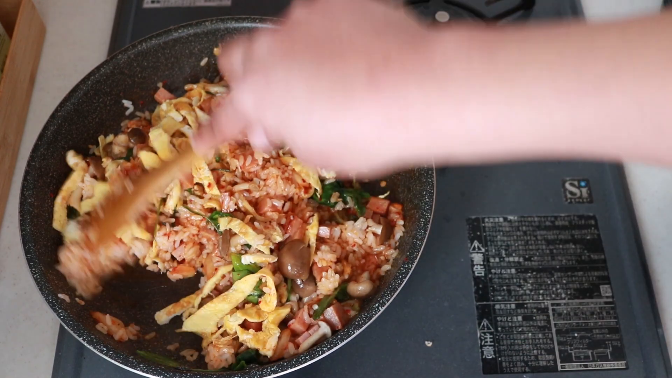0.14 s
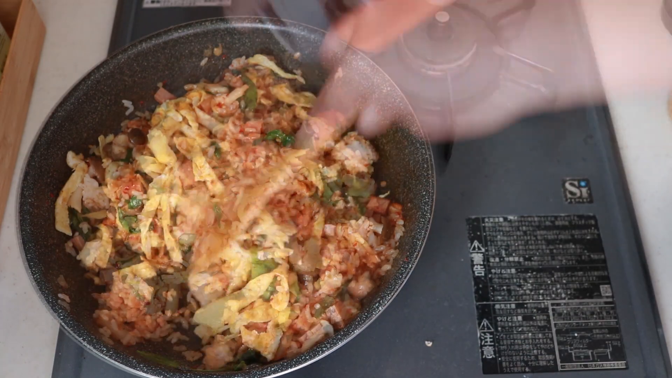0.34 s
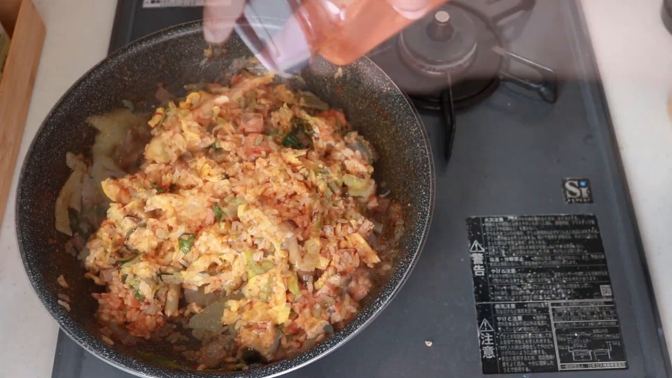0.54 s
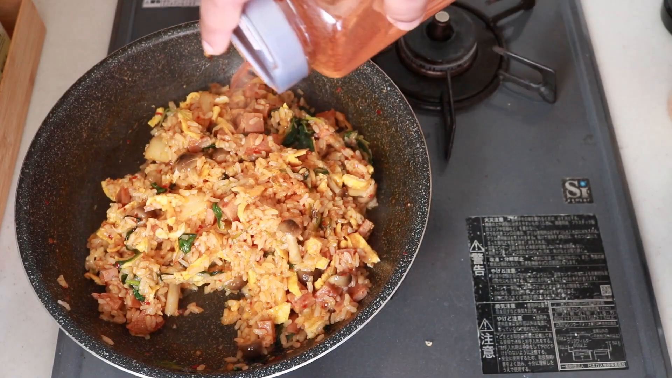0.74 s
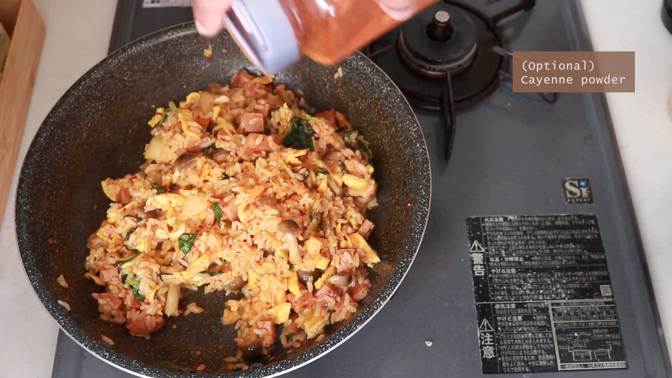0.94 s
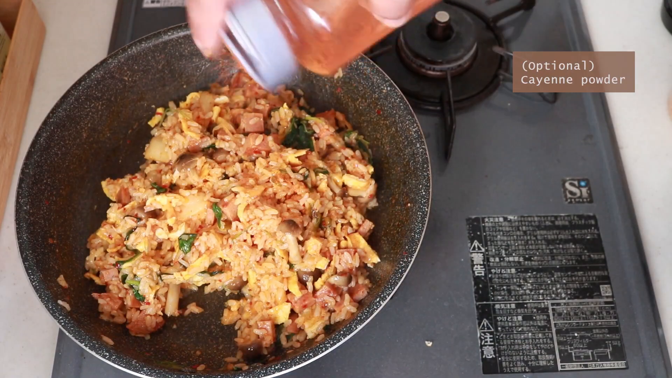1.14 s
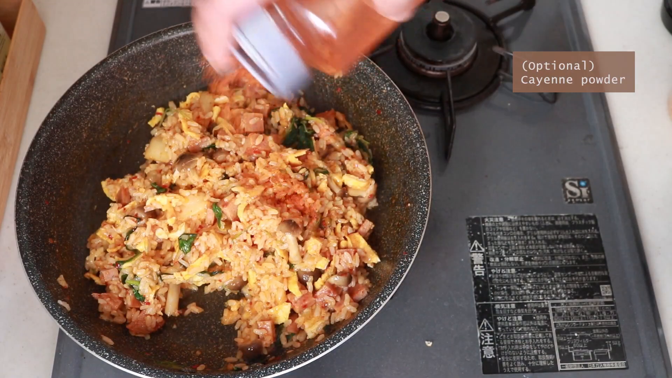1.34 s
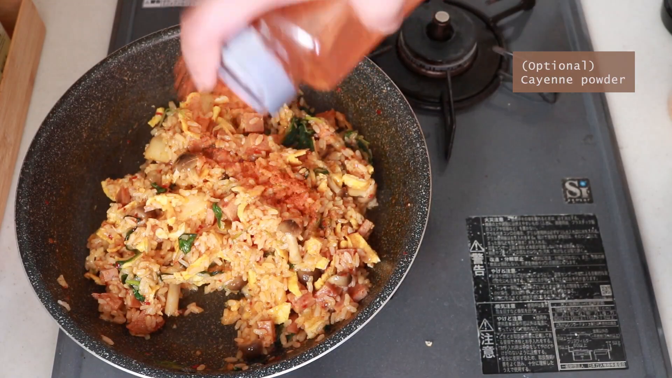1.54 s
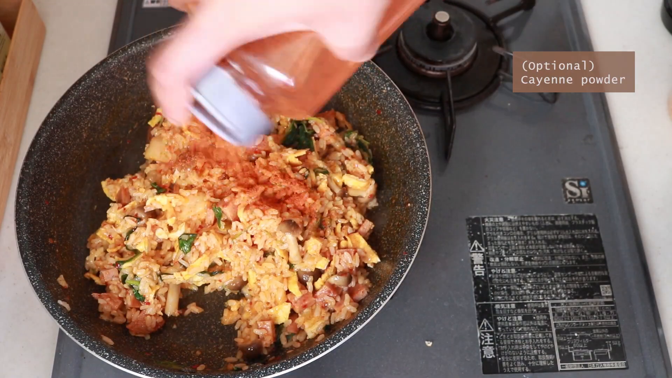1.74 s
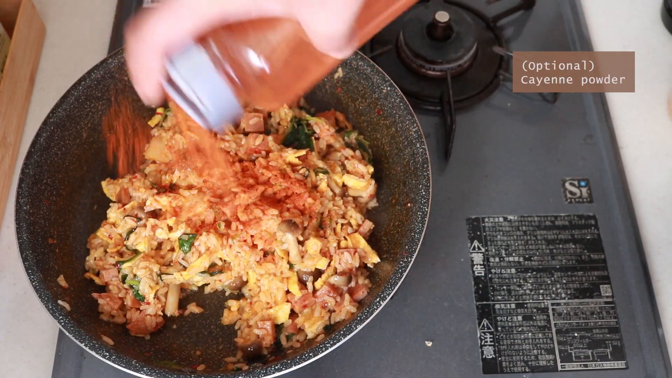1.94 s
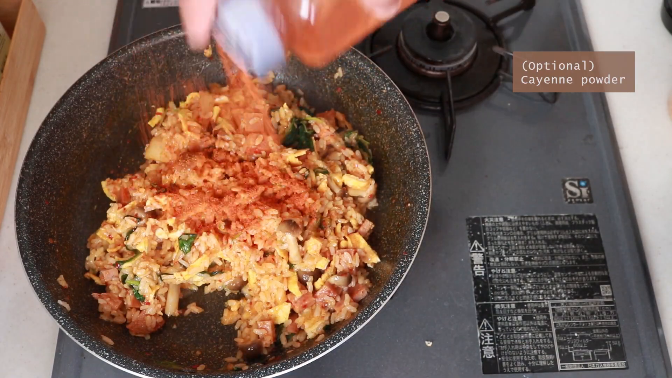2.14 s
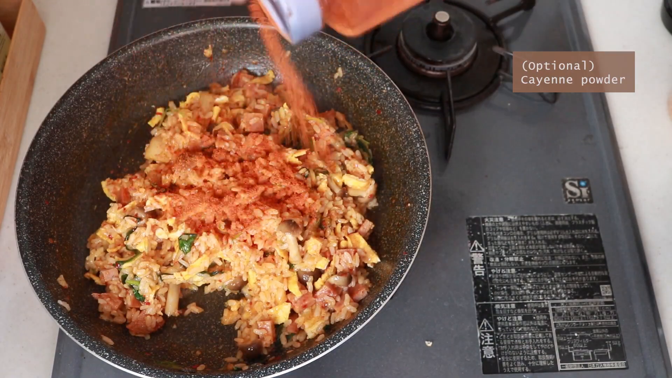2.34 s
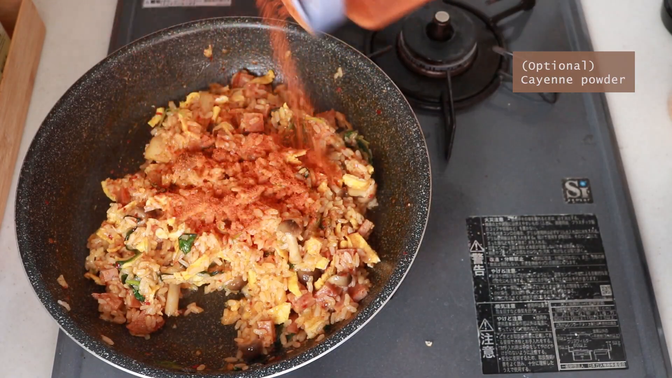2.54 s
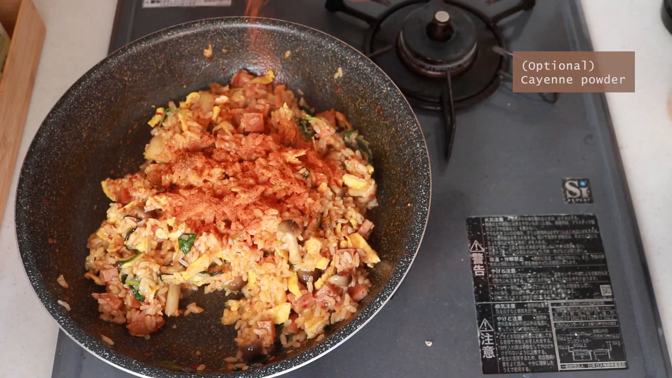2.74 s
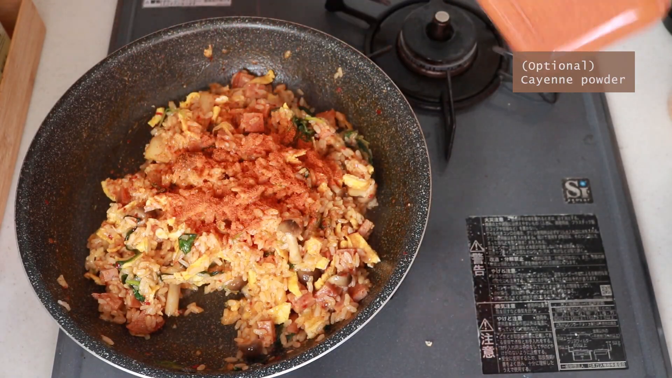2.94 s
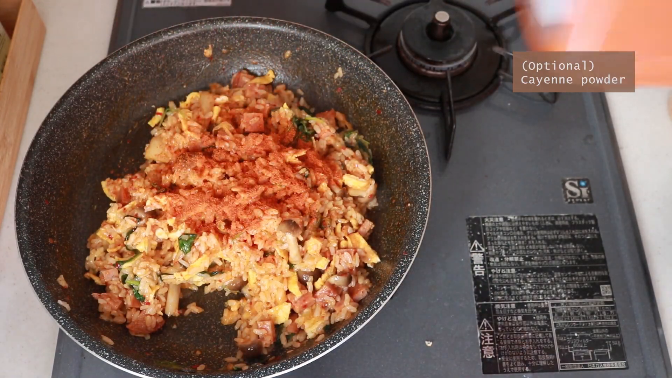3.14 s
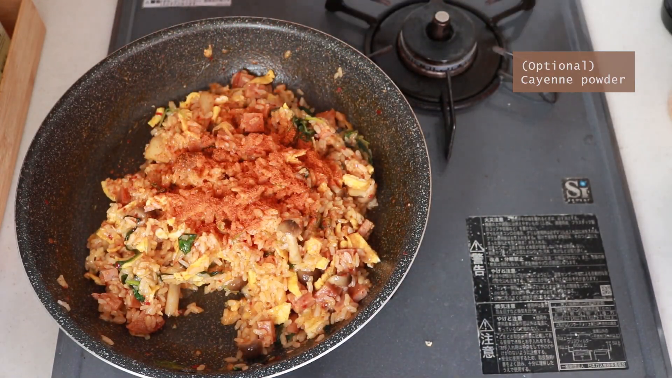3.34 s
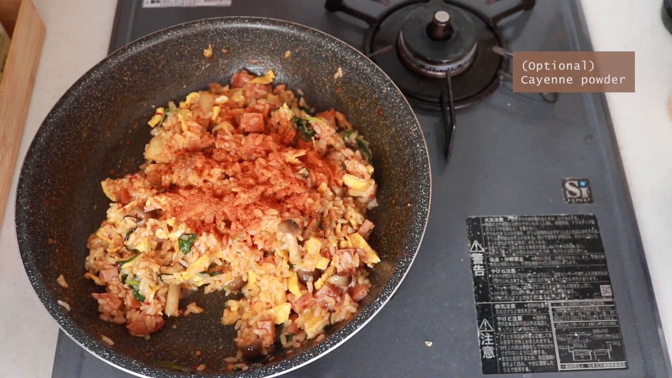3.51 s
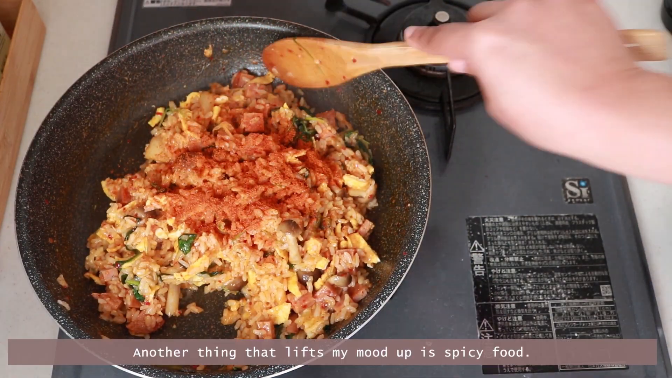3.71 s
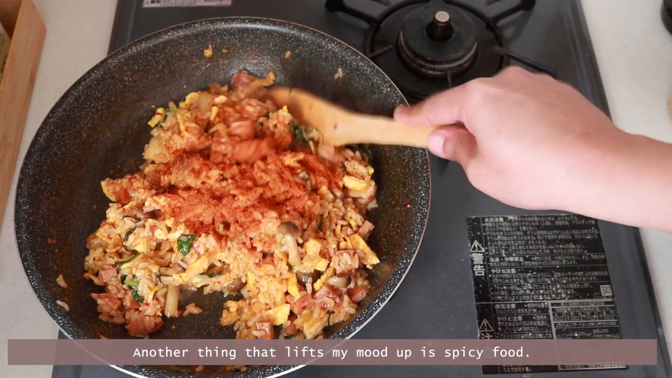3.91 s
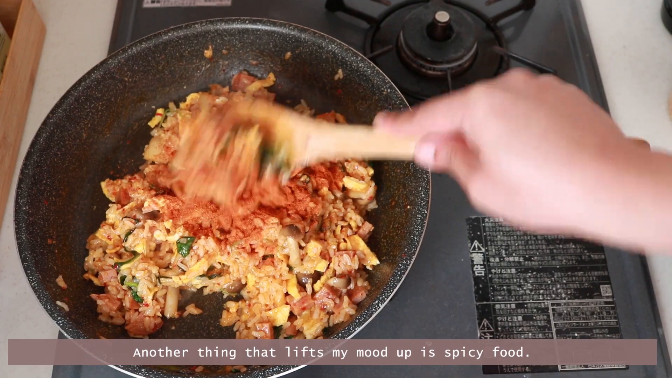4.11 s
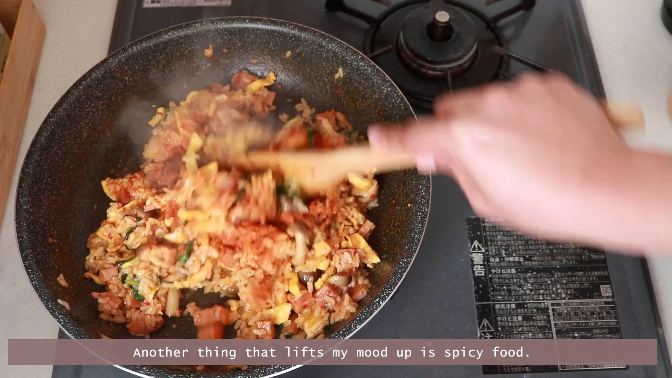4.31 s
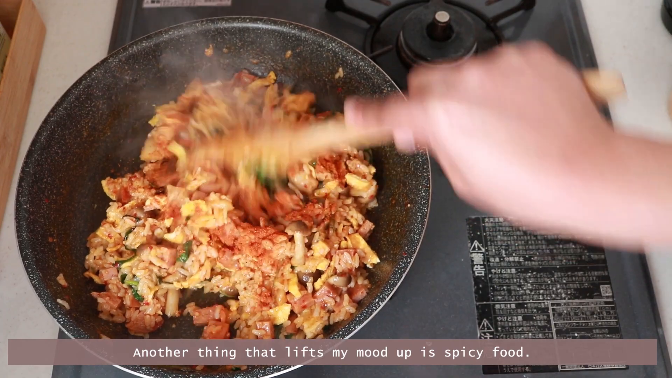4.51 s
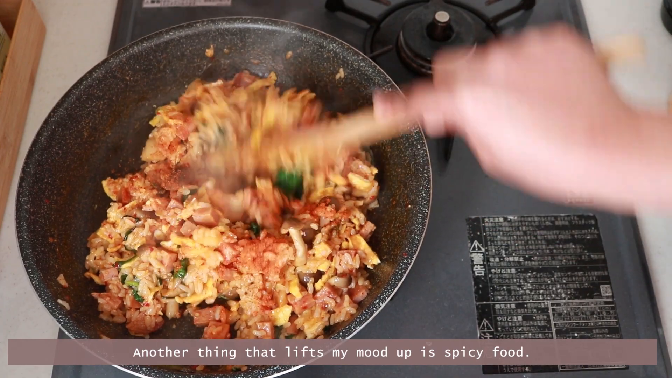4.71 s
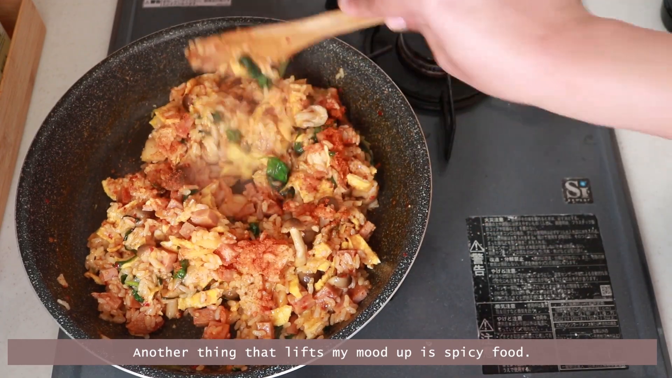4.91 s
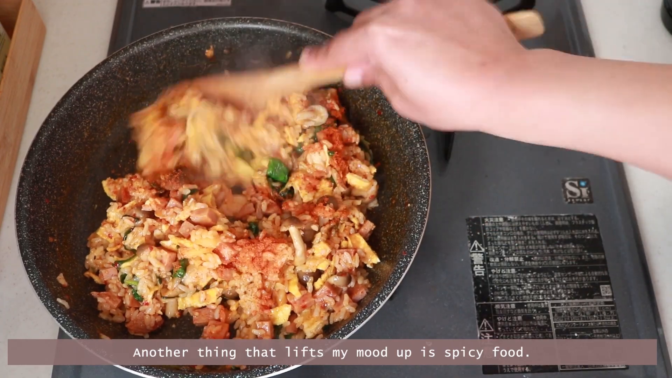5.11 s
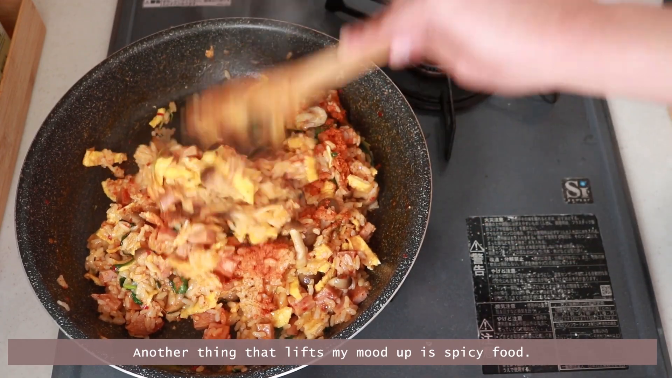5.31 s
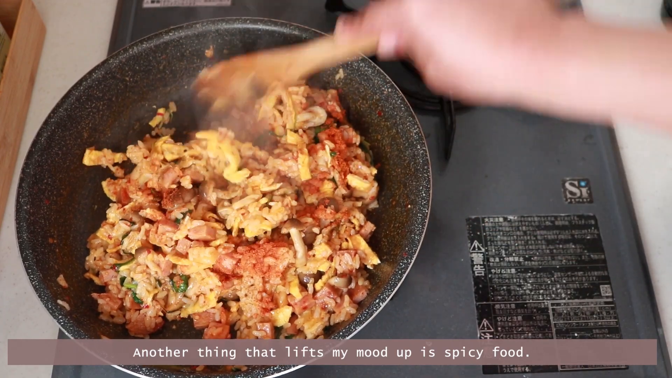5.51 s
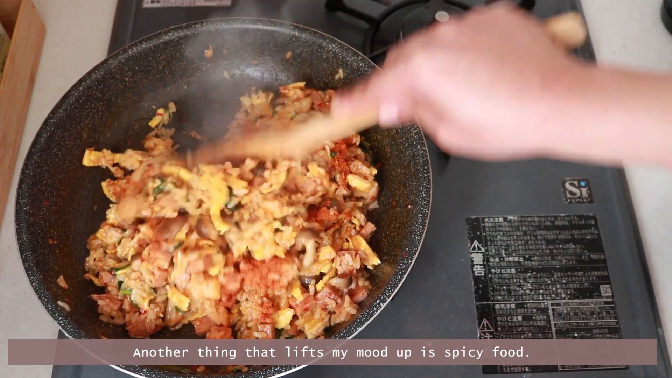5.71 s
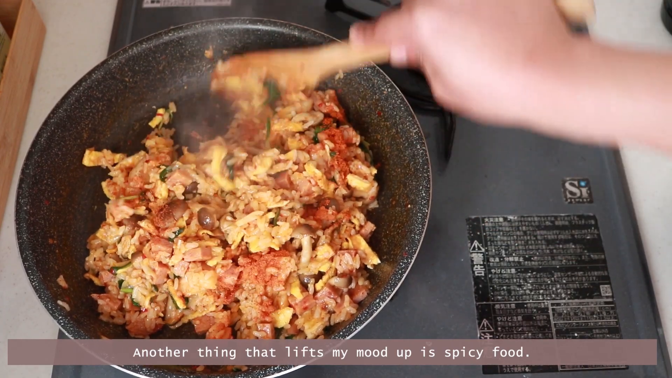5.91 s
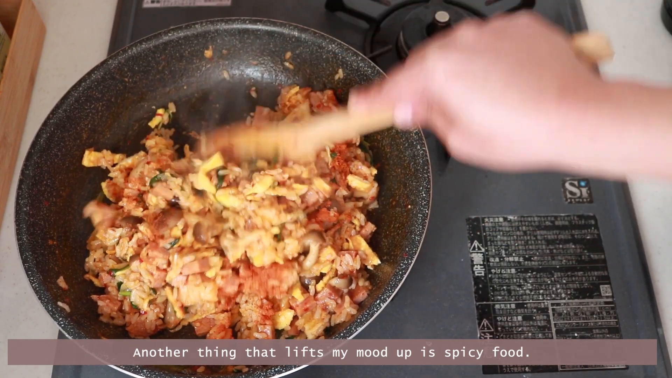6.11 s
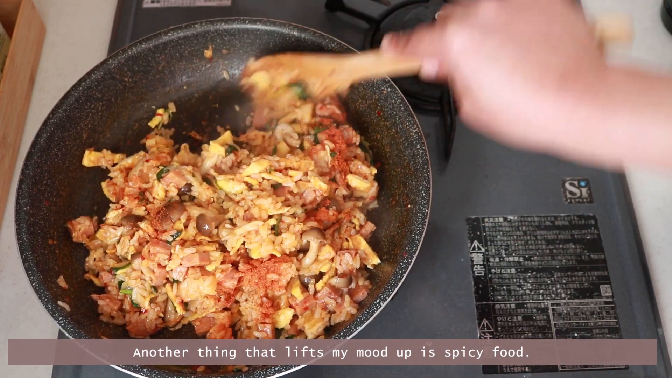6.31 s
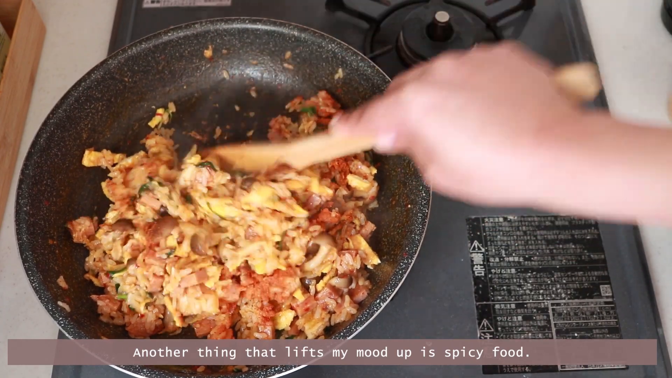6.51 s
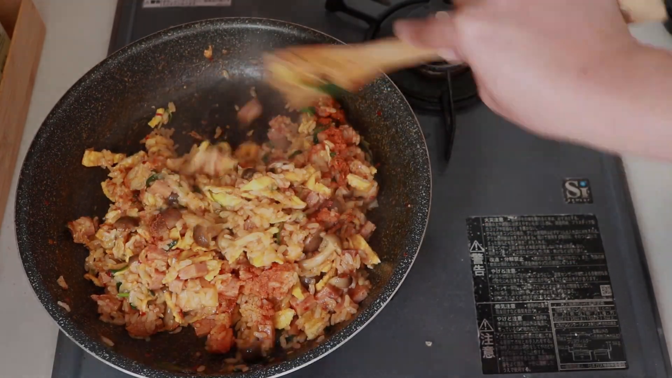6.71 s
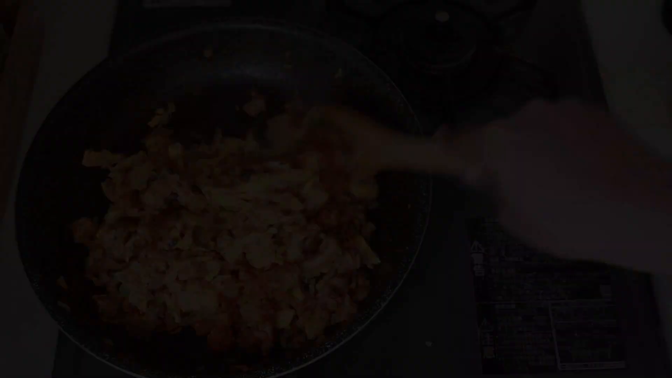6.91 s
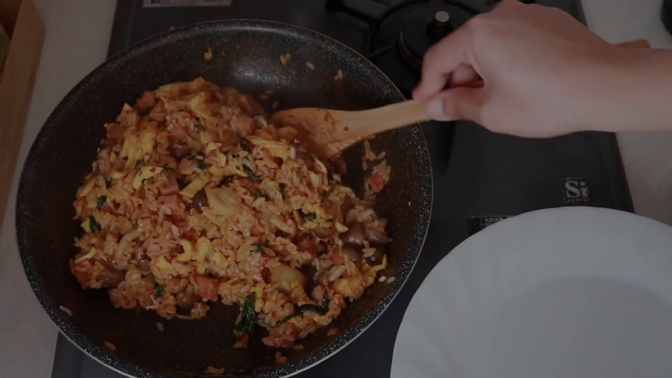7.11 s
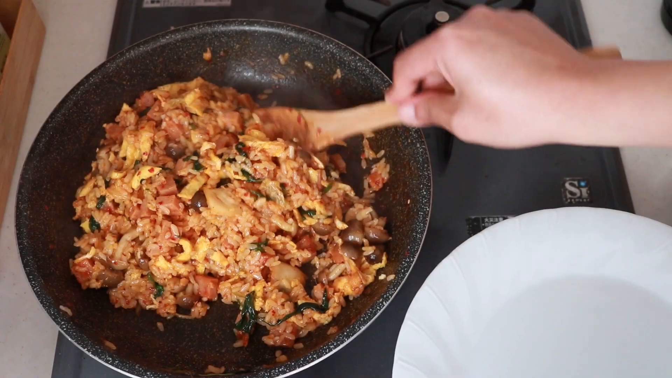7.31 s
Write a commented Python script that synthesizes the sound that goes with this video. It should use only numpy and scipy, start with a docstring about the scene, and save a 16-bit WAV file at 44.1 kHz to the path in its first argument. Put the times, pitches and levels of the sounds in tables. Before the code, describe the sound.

Rice sizzles and spits in a frying pan, then a wooden spatula knocks, scrapes and turns it with moist rustles in a small kitchen.

```python
"""Small kitchen: fried rice sizzles in a pan on a gas hob (bursting bubbles, hiss, fine spray), oil drops spit.
A wooden spoon is put down with a clack and a skid (ringing modes); shaker, spoon and pan bump dully.
Then the spoon knocks on the pan (struck modes), turns the moist rice (squelching grains)
and scrapes along the pan (slip clicks through resonances), over a low rumble and a faint hum."""
import sys
import numpy as np
from scipy import signal
from scipy.fft import rfft, irfft
from scipy.io import wavfile

SR = 44100
rng = np.random.default_rng(int(sys.argv[2]) if len(sys.argv) > 2 else 0)


def wrap_up_sound(samples):
    """Save the sound to the file named by the first command line argument, as 16-bit audio."""
    columns = np.atleast_2d(samples).T
    # keep every value between -1 and 1, then stretch to whole-number steps
    tamed = np.clip(columns, -1, 1)
    steps = np.round(tamed * 32767).astype(np.int16)
    wavfile.write(sys.argv[1], SR, steps)


N = 324132
TIME = np.arange(N) / SR
CUTOFF_HZ = 16100

# Liveliness of the frying. Each row: time in seconds, hiss level in dB before the layer gains.
FRYING_LEVEL = [(0.0, -58), (1.14, -53), (3.21, -50.5), (3.6, -52), (4.34, -49), (4.52, -50.5), (4.81, -47),
                (5.16, -50.5), (5.36, -51), (6.92, -50.5), (7.1, -57), (7.35, -60)]
# Turns of the wet rice. Each row: peak time, rise and fall in seconds, squelch level in dB before the layer gain.
RICE_TURNS = [(3.9, 0.026, 0.12, -46.5), (4.44, 0.093, 0.043, -45), (5.26, 0.14, 0.038, -43.5),
              (5.677, 0.097, 0.02, -41.5), (6.08, 0.1, 0.046, -49.5), (6.455, 0.1, 0.054, -43),
              (6.94, 0.053, 0.11, -46.5)]
# Spoon put down. One row: start in seconds, clack level in dB before the layer gain.
SPOON_CLACK = (0.2941, 0)
# Width of diffuse sound. Each row: frequency in Hz, side-signal gain in dB.
SIDE_WIDTH = [(100, -12.5), (300, -8), (700, -10), (1500, -2.5), (3000, -1.5), (8000, 1.5), (16000, -1)]


def from_db(db):
    """Amplitude ratio of a level in dB."""
    return 10 ** (np.asarray(db) / 20)


def rms_one(x):
    """Scale to an rms of 1."""
    return x / np.sqrt(np.mean(x ** 2) + 1e-20)


def at_hz(points, hz):
    """Interpolate rows of (Hz, value) over log frequency."""
    points = np.array(points)
    return np.interp(np.log(hz), np.log(points[:, 0]), points[:, 1])


def level(rows):
    """Gain over time from rows of (s, dB)."""
    return from_db(np.interp(TIME, *np.transpose(rows)))


def add(out, start_s, sound):
    """Mix a sound in at a start time."""
    i = int(np.clip(round(start_s * SR), 0, N - 1))
    out[..., i:i + sound.shape[-1]] += sound[..., :N - i]


def cut(x, hz, kind, order=2):
    """Butterworth low- or high-pass."""
    sos = signal.butter(order, min(hz, SR / 2 - 1000), kind, fs=SR, output="sos")
    return signal.sosfilt(sos, x)


def drift(rate_hz):
    """Slow random curve of rms 1: noise at SR / 40 through two equal one-pole low-passes."""
    step = 40
    r = np.exp(-2 * np.pi * rate_hz * step / SR)
    noise = rng.standard_normal(N // step + 2002)
    slow = signal.lfilter([1], [1, -2 * r, r * r], noise)[2000:]   # settled part
    return np.interp(np.arange(N) / step, np.arange(len(slow)), rms_one(slow))


def colour(x, spectrum, size=4096):
    """Causal minimum-phase filter, by folded cepstrum, that follows rows of (Hz, dB)."""
    gain_db = at_hz(spectrum, np.fft.rfftfreq(size, 1 / SR) + 1)
    cepstrum = irfft(np.log(from_db(gain_db)))
    cepstrum[1:size // 2] *= 2
    cepstrum[size // 2 + 1:] = 0
    response = irfft(np.exp(rfft(cepstrum)))
    y = signal.oaconvolve(np.atleast_2d(x), response[None], axes=1)
    return y[:, :x.shape[-1]].reshape(x.shape)


def diffuse(size):
    """Stereo noise from all around: alike in the bass, unrelated in the treble."""
    mid, side = rng.standard_normal((2, size))
    side = colour(side, SIDE_WIDTH)
    return np.array([mid + side, mid - side])


def ring(force, modes):
    """Parallel modes (Hz, dB, t60 s); at 0 dB a unit click gives a ring of unit energy."""
    out = 0
    for hz, db, t60_s in modes:
        r = np.exp(-np.log(1000) / (t60_s * SR))
        w = 2 * np.pi * min(hz, SR / 2 - 1000) / SR
        gain = from_db(db) * np.sqrt(2 * (1 - r * r))
        numerator, denominator = [gain, -gain * r * np.cos(w)], [1, -2 * r * np.cos(w), r * r]
        out = out + signal.lfilter(numerator, denominator, force + 1e-18)
    return out


def clicks(per_s, spread_db, size=N):
    """Random clicks of either sign, many small and a few large."""
    chance, weight = rng.random((2, size))
    out = np.zeros(size)
    at = np.flatnonzero(chance < per_s / SR)
    signed = 2 * weight[at] - 1
    rarity = np.minimum(-np.log(np.abs(signed) + 1e-9), 4)
    out[at] = np.sign(signed) * from_db(spread_db * rarity)
    return out


def swell(peak_s, rise_s, fall_s):
    """A push that builds up to its peak and lets go."""
    away = np.abs((TIME - peak_s) / np.where(TIME < peak_s, rise_s, fall_s))
    return np.exp(-np.minimum(away, 9) ** 1.4)


def kitchen(x, wet_db, size=16000):
    """Direct sound, quick reflections from hob and tiles, and a diffuse tail with a decay time per band."""
    # Room decay. Each row: frequency in Hz, t60 in seconds.
    decay_times = [(150, 0.5), (500, 0.2565), (2000, 0.18), (8000, 0.08), (16000, 0.21)]
    t, noise, tail = np.arange(size) / SR, diffuse(size), 0
    edges_hz = np.geomspace(80, 14500, 9)
    for low, high in zip(edges_hz, edges_hz[1:]):
        t60_s = at_hz(decay_times, np.sqrt(low * high))
        band = signal.sosfilt(signal.butter(2, [low, high], "band", fs=SR, output="sos"), noise)
        tail = tail + band * np.exp(-np.log(1000) * t / t60_s)
    tail = tail * np.clip(t / 0.0042 - .3, 0, 1)
    tail = tail / np.sqrt(np.sum(tail ** 2) / 2)
    # side reflections reach left and right in opposite phase
    near = rng.standard_normal(size) * np.exp(-t / 0.0028)
    near = colour(near / np.sqrt(np.sum(near ** 2)), SIDE_WIDTH)
    near = cut(near, 450, "high") * [[1], [-1]]
    response = from_db(wet_db) * tail + from_db(-3.0) * near
    return x + signal.oaconvolve(x * np.ones((2, 1)), response, axes=1)[:, :N]


def rumble():
    """Low diffuse noise shaped by a fixed spectrum."""
    # Each row: frequency in Hz, relative density in dB per Hz.
    spectrum = [(20, -13), (40, -15), (58, 2), (80, -7.5), (120, -8.5), (200, -10), (400, -10), (900, -15),
                (3000, -29)]
    return from_db(-68.5) * rms_one(colour(diffuse(N), spectrum))


def hum():
    """Faint steady sine; the level is its rms."""
    return from_db(-77.5) * np.sqrt(2) * np.sin(2 * np.pi * 59.5 * TIME)


def crackle(per_s, spread_db, low_hz, high_hz, cycles, count=13):
    """Tiny bursting bubbles as short rings at a row of pitches, alternating in side; rms 1."""
    out = np.zeros((2, N))
    for k, hz in enumerate(np.geomspace(low_hz, high_hz, count)):
        grains = ring(clicks(per_s / count, spread_db), [(hz, 10 * np.log10(hz), cycles / hz)])
        out += grains * from_db(np.array([[1], [-1]]) * (-1) ** k * 2.2)
    return rms_one(out)


def sizzle():
    """Water boils out of the rice: crackle on a smooth hiss; the spray also swells as moist rice is turned."""
    # Body and spray spectra. Each row: frequency in Hz, relative density in dB per Hz.
    body_spectrum = [(150, -20.5), (400, -4.5), (620, -12), (760, -0.5), (1130, 2), (1900, 1.5),
                     (3000, 1.5), (4400, -1.5), (7000, -8), (10000, -22.5), (16000, -49)]
    spray_spectrum = [(2000, -22.5), (5000, -3.5), (8000, -4), (10000, -8.5), (12000, -13), (14400, -9.5),
                      (16000, -22)]
    body_gain_db, spray_gain_db = -0.5, -2.5
    steam_over_squelch_db, steam_rise_s, steam_fall_s = -20.5, 0.069, 0.71

    bubbles = crackle(1000 * from_db(3 * drift(7.9)), spread_db=7.0, low_hz=770, high_hz=11600, cycles=4.2)
    body = rms_one(kitchen(bubbles, wet_db=-0.5)) + from_db(0.5) * diffuse(N)
    body = rms_one(colour(body, body_spectrum))

    mist = crackle(900 * from_db(2.3 * drift(1.7)), spread_db=5.0, low_hz=5000, high_hz=14500, cycles=3.5)
    spray = rms_one(kitchen(mist, wet_db=-7)) + from_db(-2.0) * diffuse(N)
    spray = rms_one(colour(spray, spray_spectrum))

    frying = level(FRYING_LEVEL)
    steam = sum(from_db(db + steam_over_squelch_db) * swell(peak_s, steam_rise_s, steam_fall_s)
                for peak_s, _, _, db in RICE_TURNS)
    spray = spray * np.hypot(from_db(spray_gain_db) * frying, steam)
    return from_db(body_gain_db) * frying * body + spray * from_db([[.8], [-.8]])


def small_drops(count=300):
    """Random drops, louder in livelier frying, as rows of (s, dB, pitch Hz, left-right dB)."""
    drops_per_s = 16
    over_hiss_db, spread_db = 17, 3
    centre_hz, spread_octaves = 5200, 0.47
    pan_db, pan_spread_db = 1.0, 2.5
    when, chance = rng.random((count, 2)).T
    strength, pitch, side = np.clip(rng.standard_normal((count, 3)), -2, 2).T
    s = when * N / SR
    db = np.interp(s, *np.transpose(FRYING_LEVEL)) + over_hiss_db + spread_db * strength
    hz = centre_hz * 2 ** (spread_octaves * pitch)
    rows = np.column_stack([s, db, hz, pan_db + pan_spread_db * side])
    return rows[chance < drops_per_s * N / SR / count]


def spits(size=400):
    """A drop bursts with a snap of about one cycle; the pan wall throws it back within a few milliseconds."""
    # Loudest snaps: bursting drops, and the shaker's sharp shakes from 2.07 to 2.30 s. Each row: start in
    # seconds, # level in dB, pitch in Hz, left-right balance in dB; level and balance are before the layer
    # gains.
    loud_snaps = [(0.404, -32, 3770, -3), (0.5417, -35.5, 3700, -7), (0.5876, -35.5, 4000, -3),
                  (0.8888, -32, 2980, -3), (1.058, -28, 3370, 0), (1.2945, -25, 3470, -7.5),
                  (1.4648, -28, 3200, 3), (1.538, -27.5, 5550, -2), (1.6163, -28, 8050, -2),
                  (2.0722, -21, 7600, -2), (2.0864, -24.5, 8330, -3), (2.1474, -31.5, 2650, 2.0),
                  (2.173, -27, 2950, -3), (2.2328, -22, 5690, 1.5), (2.2954, -22.5, 8200, 1),
                  (2.592, -29.5, 4020, -1), (2.69, -32, 3030, -4), (2.814, -23.5, 3200, 2),
                  (2.856, -25, 9600, 0), (3.048, -27, 2280, -1.5), (3.101, -34, 3220, -4),
                  (3.3064, -27.5, 6400, -0.5), (3.5109, -29.5, 3360, -5), (3.851, -19.5, 6600, -0.5),
                  (4.0063, -23.5, 2460, 0.0), (4.427, -35, 2330, 1.0), (4.5317, -15.5, 10500, 2.5),
                  (4.58, -29, 4600, 1.0), (4.6308, -25, 3650, -4), (4.874, -28, 3450, 4),
                  (4.9624, -26.5, 2800, 0.0), (5.32, -26.5, 3220, -1), (6.4164, -23.5, 5450, -1),
                  (6.576, -34, 6800, -6)]
    top_over_pitch = 2.66
    out, t = np.zeros((2, N)), np.arange(size) / SR
    # hollow between the grains
    plop = ring(signal.unit_impulse(size), [(1500, -26.5, 0.0013), (3370, -12, 0.0023)])
    for s, db, hz, pan_db in [*loud_snaps, *small_drops()]:
        turns = t * min(hz, CUTOFF_HZ)
        snap = np.cos(2 * np.pi * turns) * np.exp(-turns / 0.52)
        burst = cut(snap + from_db(-14.5) * plop, 800, "high")
        burst = cut(burst, top_over_pitch * hz, "low")
        scatter = rng.standard_normal((2, size)) * np.exp(-t / 0.0036)
        scatter = scatter / np.sqrt(np.sum(scatter ** 2) / 2)
        echoes = signal.fftconvolve(burst[None], scatter, axes=1)[:, :size]
        balance = from_db([[pan_db / 2], [-pan_db / 2]])
        add(out, s, from_db(db) * (burst + from_db(0.5) * echoes) * balance)
    return from_db(4.5) * kitchen(out, wet_db=-5) * from_db([[.5], [-.5]])


def skid_level():
    """The skid sets in with the clack, holds and dies away."""
    start_db, attack_s, hold_s, release_db_per_s = -32.5, 0.0085, 0.061, 520
    t = np.maximum(TIME - SPOON_CLACK[0], 0)
    attack = 1 - np.exp(-t / attack_s)
    return attack * from_db(start_db - release_db_per_s * np.clip(t - hold_s, 0, .5))


def spoon_down():
    """One dry clack, then the spoon skids to rest; wood carries little treble."""
    # Modes of spoon and rest. Each row: frequency in Hz, level in dB, t60 in seconds (as in the skid).
    modes = [(624, -13, 0.037), (815, -12.5, 0.052), (1170, -13.5, 0.012), (1340, -6.5, 0.025),
             (1510, -5, 0.0094), (1660, -12, 0.057), (1820, -10, 0.041), (2200, -18, 0.026),
             (2480, -12, 0.018), (2870, -0.5, 0.016), (3150, -13, 0.028), (3280, -9, 0.046),
             (3270, -0.5, 0.016), (3560, -4.5, 0.012), (5000, -14, 0.0057), (5110, -14, 0.017),
             (5750, -15, 0.0071)]
    start_s, clack_db = SPOON_CLACK
    tap = from_db(clack_db) * signal.unit_impulse(SR // 10)
    clack_modes = [(hz, db, t60_s * 0.76) for hz, db, t60_s in modes]   # the clack rings shorter
    clack = cut(ring(tap, clack_modes), 3570, "low", order=6)
    slips = (clicks(3500, 1.4) * skid_level())[:SR]
    skid = cut(ring(slips, modes[::2]) - ring(slips, modes[1::2]), 11400, "low", order=6)
    spoon = np.zeros(N)
    add(spoon, start_s, from_db(-11) * clack)
    add(spoon, 0, from_db(5.5) * skid)
    return kitchen(cut(spoon, 400, "high"), wet_db=-9)


def bumps():
    """Dull handling noises: a damped mode with a weak overtone, mixed with a short scuff."""
    # Bumps of shaker, spoon and rocking pan.
    # Each row: start in seconds, level in dB, pitch in Hz, scuff share of energy (0-1).
    hits = [(0.317, -16, 168, 0), (0.355, -35, 176, 0.1), (0.419, -32.5, 202, 0), (0.835, -31, 636, 0.7),
            (1.934, -21, 355, 0.6), (3.433, -26.5, 335, 0.65), (3.68, -32.5, 76, 0.5),
            (4.415, -10.5, 155, 0.42), (5.096, -9, 162, 0.1), (5.559, -19, 185, 0.4),
            (6.862, -11, 255, 0.03), (6.89, -13, 215, 0.23)]
    scuff_decay_s, scuff_top_hz = 0.018, 764
    out, t = np.zeros(N), np.arange(SR // 2) / SR
    for s, db, hz, share in hits:
        share = np.clip(share, 0, 1)
        scuff = cut(rng.standard_normal(len(t)) * np.exp(-t / scuff_decay_s), scuff_top_hz, "low")
        scuff = cut(scuff, hz * 1.1, "high")
        scuff = scuff / np.sqrt(np.sum(scuff ** 2))
        thump = ring(signal.unit_impulse(len(t)), [(hz, 0, .08), (hz * 1.55, -18, .04)])
        add(out, s, from_db(db) * (np.sqrt(share) * scuff + np.sqrt(1 - share) * thump))
    return kitchen(cut(cut(out, 1200, "low"), 70, "high"), wet_db=-5)


def answer_db(hz, blow_db, place, hardness):
    """Level of a mode under a blow: place picks the modes, hard contact adds treble, a light blow lacks bass."""
    # Answer by place struck. Each row: frequency in Hz, gain in dB on the floor, gain in dB on the wall.
    place_gains = [(198, 0, -1), (497, 8.5, -7), (1100, -5.5, 16.5), (1445, 4, -19.5), (1930, -8, -6),
                   (2700, -11.5, 5.5)]
    # only a firm blow moves the heavy pan: dB lost per octave below 1 kHz, per dB short of firm
    firm_db, bass_loss = -41.5, 0.5
    range_hz, floor_db, wall_db = np.transpose(place_gains)
    struck_db = floor_db + np.clip(place, 0, 1) * (wall_db - floor_db)
    place_db = np.interp(np.log(hz), np.log(range_hz), struck_db)
    khz = hz / 1000
    lost_db = bass_loss * max(firm_db - blow_db, 0) * max(-np.log2(khz), 0)
    return blow_db + place_db + hardness * (khz - 1) - lost_db


def struck(force, modes):
    """Each mode takes its set share of the blow's energy, however the chatter falls."""
    out = 0
    for hz, db, t60_s in modes:
        tone = ring(force, [(hz, 0, t60_s)])
        out = out + from_db(db) * tone / np.sqrt(np.sum(tone ** 2))
    return out


def knocks(size=4400):
    """The spoon lands, then chatters as it is dragged; where it lands decides which modes ring."""
    # Each row: start in seconds, level in dB before the layer gain, place from floor 0 to wall 1,
    # hardness in dB per kHz, drag share of energy (0-1).
    blows = [(3.815, -45.5, 0.92, 1.5, 0), (3.995, -47, 0.025, -2.5, 0.27), (4.28, -56.5, 0.43, 5.5, 0.12),
             (4.395, -42, 0.15, 2.5, 0.17), (5.065, -53.5, 0.1, 13, 0.3), (5.078, -40, 0.45, 5, 0.17),
             (5.247, -43, 0.092, -1.5, 0.18), (5.545, -57.5, 0.23, 2, 0.35), (5.74, -43, 0.21, 2.5, 0.12),
             (5.95, -42.5, 0.68, -4, 0.09), (6.153, -44.5, 0.02, -0.5, 0.13), (6.813, -42, 0.43, 1, 0.4),
             (6.972, -46.5, 0.33, -2, 0.25), (7.017, -44, 0.4, -4, 0.16), (7.295, -59.5, 0.57, -1, 0.5),
             (7.336, -56.5, 1, -12, 0.38)]
    # Modes of the rice-laden pan, the wood, the hob's top and the first contact.
    # Each row: frequency in Hz, relative level in dB, t60 in seconds.
    pan_modes = [(155.5, -1, 0.47), (176.2, -1.5, 0.34), (209, 1, 0.065), (228, 1.5, 0.12),
                 (258.5, -4.5, 0.31), (293, -6.5, 0.065), (364, 1.5, 0.17), (434.4, -4.5, 0.1),
                 (501.6, 2, 0.08), (590, 0, 0.15), (738, -1.5, 0.076), (844, -0.5, 0.12), (830, -2, 0.046),
                 (972, -0.5, 0.025), (1150, -29, 0.016), (1129, 10, 0.037), (1233, 2, 0.043),
                 (1340, -2.5, 0.096), (1395, 0.5, 0.019), (1482, 6.5, 0.01), (1770, -8.5, 0.22),
                 (1920, 2.5, 0.011), (2190, -2.5, 0.1), (2399, 0, 0.039), (2520, -16, 0.02),
                 (2935, -7, 0.038), (3150, -37, 0.073), (3530, -18, 0.034)]
    wood_modes = [(590, -5, 0.021), (1114, 8, 0.031), (1330, -27, 0.016), (2600, 2.5, 0.003)]
    hob_modes = [(86, -16.5, 0.16)]
    crack_modes = [(1410, -4.5, 0.0017), (3000, -10.5, 0.00064)]
    mode_spread_hz, mode_spread_db = 4.2, 2.5   # no two blows land alike
    crack_top_hz, crack_octaves = 3020, 0.33    # top at hardness 0, rise per step of hardness

    out, t = np.zeros(N), np.arange(size) / SR
    for s, blow_db, place, hardness, drag in blows:
        drag = np.clip(drag, 0, .6)
        chatter = cut(clicks(700, 2.6, size=size) * np.exp(-t / 0.026), 5500, "low")
        force = np.sqrt(drag) * chatter / np.sqrt(np.sum(chatter ** 2) + 1e-12)
        force[0] += np.sqrt(1 - drag)
        force = np.pad(force, (0, 2 * size))

        def varied(modes):
            """The shifting load of rice moves each mode a little in pitch and level."""
            return [(hz + rng.normal(0, mode_spread_hz),
                     db + answer_db(hz, blow_db, place, hardness) + mode_spread_db * rng.standard_normal(),
                     t60_s) for hz, db, t60_s in modes]

        pan, wood, hob = varied(pan_modes), varied(wood_modes), varied(hob_modes)
        crack = [(hz, db + answer_db(hz, blow_db, place, hardness), t60_s) for hz, db, t60_s in crack_modes]
        top_hz = crack_top_hz * 2 ** (crack_octaves * hardness)
        touch = cut(np.sqrt(1 - drag) * signal.unit_impulse(size), top_hz, "low")
        add(out, s, ring(touch, crack))
        # neighbouring pan modes move in opposite directions
        add(out, s, struck(force, pan[::2]) - struck(force, pan[1::2]) + struck(force, wood + hob))
    out = cut(cut(out, 64, "high"), 8800, "low")
    return from_db(27) * kitchen(out, wet_db=-10.5) * from_db([[.5], [-.5]])


def squelches():
    """Sticky grains part and fresh ones meet the hot metal as the rice is turned."""
    # Each row: frequency in Hz, gain in dB.
    wet_spectrum = [(700, -15), (2000, 4), (4000, 2), (7000, 4.5), (10000, 0), (14000, -5.5), (16000, -9)]
    push = sum(from_db(db) * swell(peak_s, rise_s, fall_s) for peak_s, rise_s, fall_s, db in RICE_TURNS)
    grains = crackle(3200, spread_db=3.5, low_hz=1500, high_hz=14300, cycles=7.0)
    grains = rms_one(colour(grains, wet_spectrum))
    return from_db(1.5) * kitchen(push * grains, wet_db=-4) * from_db([[.7], [-.7]])


def scrapes():
    """Wood slips over the rough coating in uneven flurries of jerks that ring spoon and pan."""
    # Each row: time of the hardest push, rise and fall in seconds, level in dB before the layer gain,
    # brightness in dB per octave about 1 kHz.
    strokes = [(3.969, 0.12, 0.051, -45.5, 8.5), (4.418, 0.05, 0.041, -38, -1.5),
               (5.19, 0.084, 0.087, -44, 6), (5.268, 0.059, 0.065, -44.5, -10),
               (5.655, 0.029, 0.056, -37, 3.5), (6.115, 0.057, 0.058, -39, -1.5),
               (6.478, 0.025, 0.046, -27.5, -0.5), (6.899, 0.029, 0.049, -45, 2.5),
               (6.993, 0.0057, 0.01, -32, -12), (7.029, 0.0068, 0.024, -31, -3.5)]
    # Resonances of the scraping spoon. Each row: frequency in Hz, relative level in dB, t60 in seconds.
    resonances = [(184, -24.5, 0.12), (277, -33, 0.31), (540, -9, 0.022), (812, -0.5, 0.17),
                  (929, -0.5, 0.2), (1024, 0.5, 0.018), (1143, 0.5, 0.055), (1310, -3, 0.018),
                  (1595, -4, 0.011), (1746, -4, 0.021), (2066, -9.5, 0.03), (2280, -1.5, 0.011),
                  (2470, 1, 0.0058), (2875, -3.5, 0.0081)]
    out = np.zeros(N)
    for peak_s, rise_s, fall_s, db, bright_db in strokes:
        modes = [(hz, mode_db + bright_db * np.log2(hz / 1000), t60_s) for hz, mode_db, t60_s in resonances]
        slips = clicks(1500, 1.7, size=SR) * from_db(2 * drift(55)[:SR])
        rasp = cut(ring(slips, modes[::2]) - ring(slips, modes[1::2]), 5900, "low")
        stroke = np.zeros(N)
        add(stroke, peak_s - .5, rms_one(rasp))
        out += from_db(db) * swell(peak_s, rise_s, fall_s) * stroke
    return from_db(-1.5) * kitchen(cut(out, 150, "high"), wet_db=-12)


def scene():
    """Sum of all layers."""
    background = rumble() + hum()
    frying = sizzle() + spits()
    handling = spoon_down() + bumps()
    stirring = knocks() + squelches() + scrapes()
    return background + frying + handling + stirring


def record(dry):
    """The microphone's range ends steeply at the top."""
    return signal.sosfilt(signal.ellip(10, .2, 70, CUTOFF_HZ, fs=SR, output="sos"), dry)


dry = scene()
out = record(dry)
wrap_up_sound(out)
```